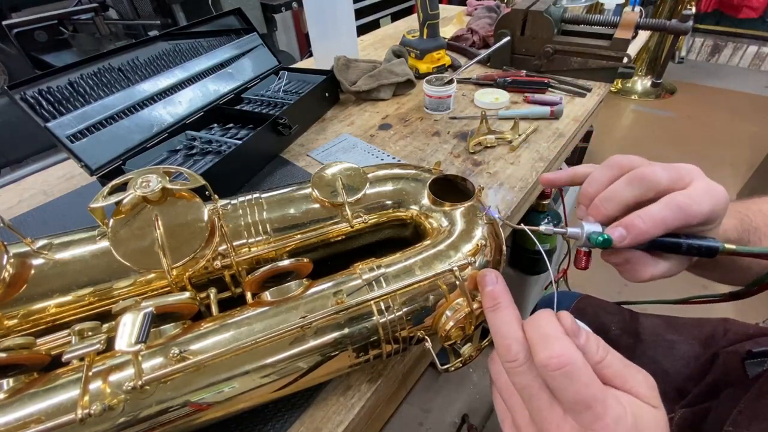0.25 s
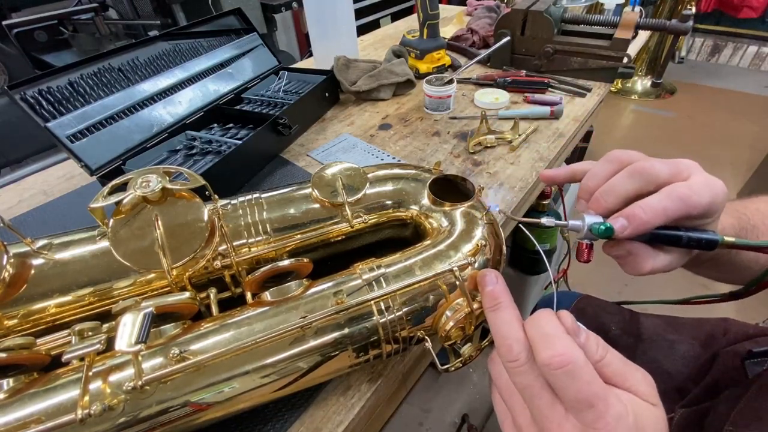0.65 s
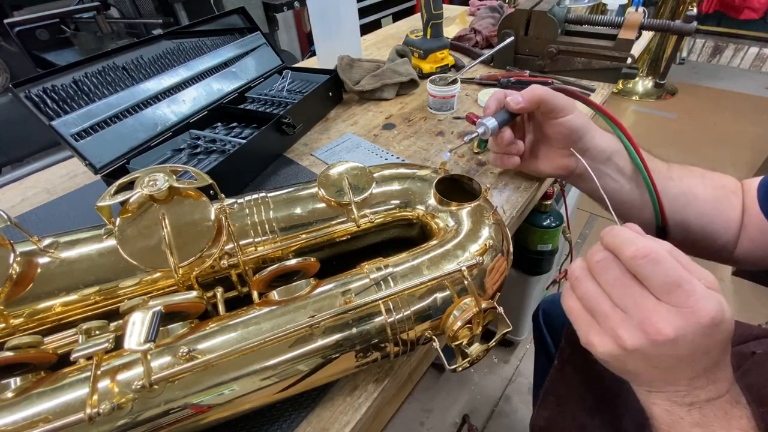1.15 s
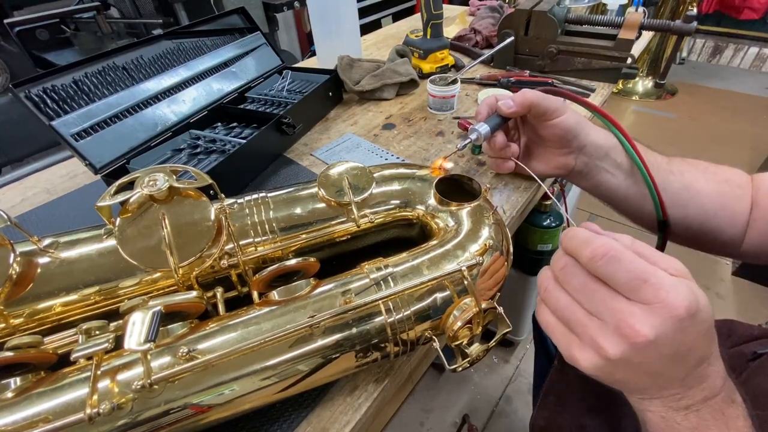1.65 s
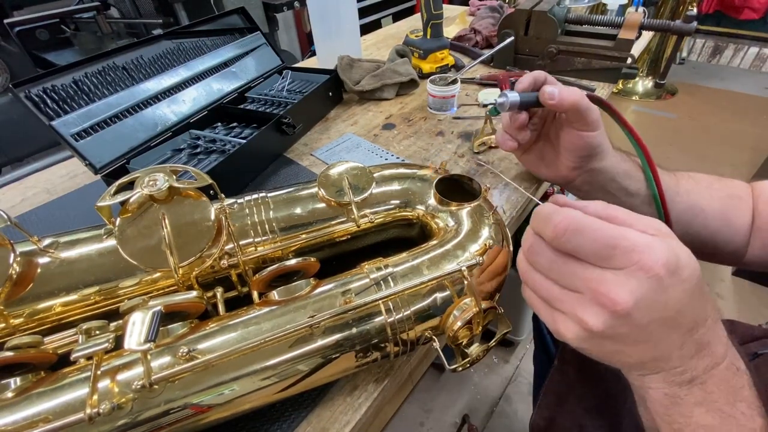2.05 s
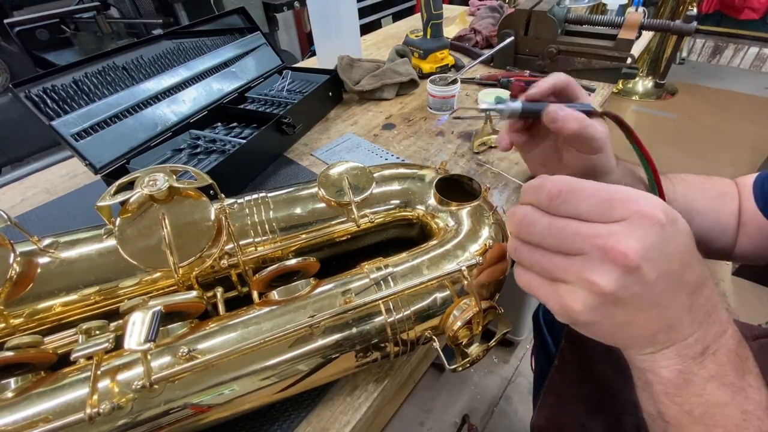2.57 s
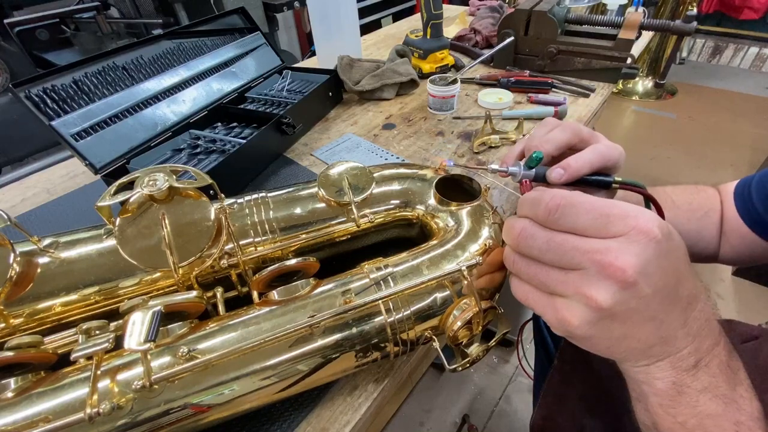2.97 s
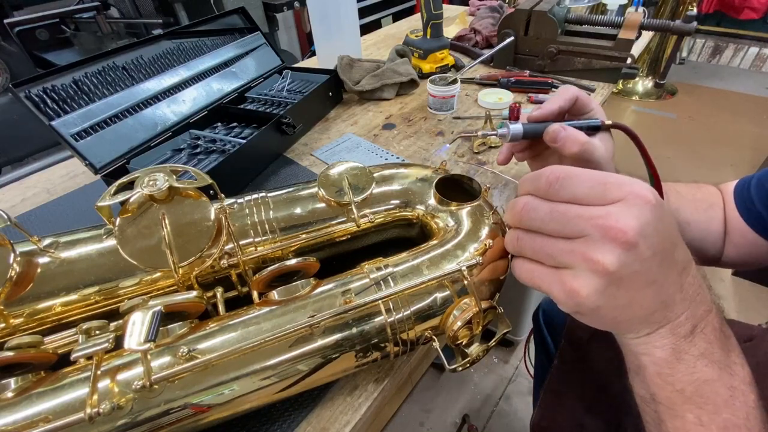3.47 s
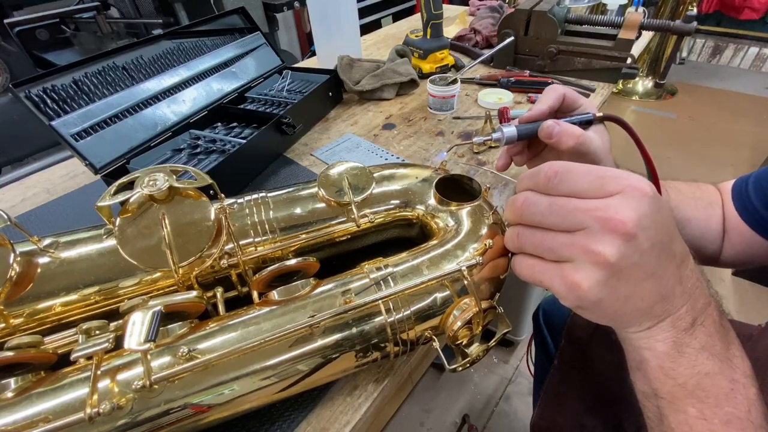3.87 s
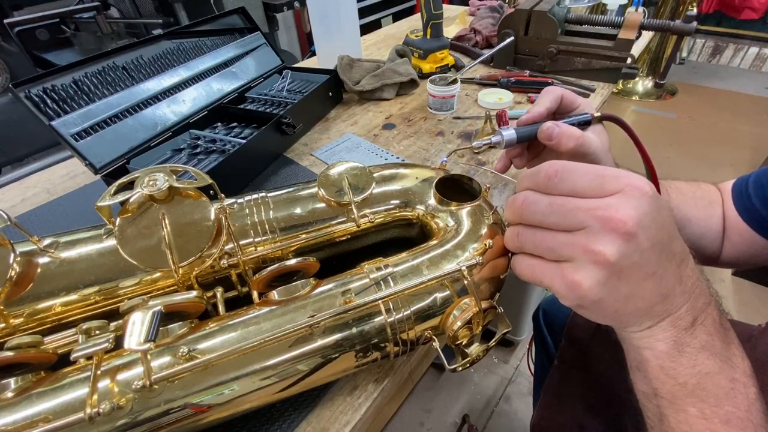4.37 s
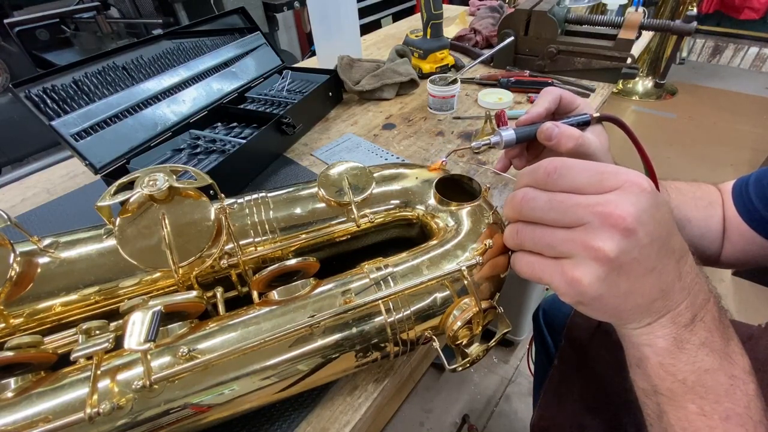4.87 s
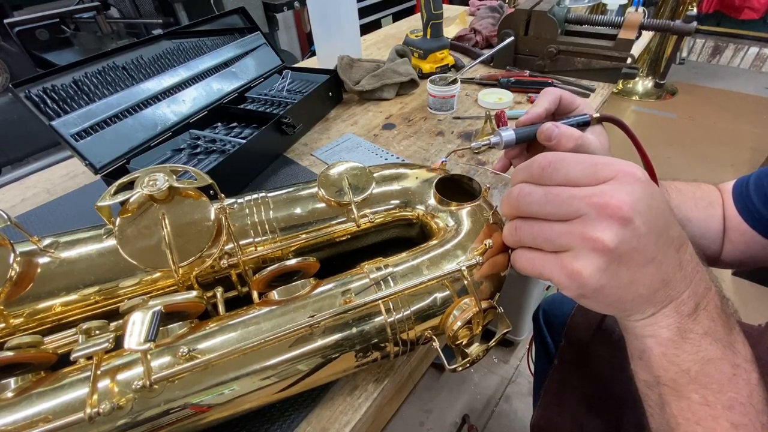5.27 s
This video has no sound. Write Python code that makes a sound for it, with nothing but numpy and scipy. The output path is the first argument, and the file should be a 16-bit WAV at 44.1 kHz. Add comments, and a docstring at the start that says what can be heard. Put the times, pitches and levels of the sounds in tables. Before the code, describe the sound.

Close in an indoor workshop, a twin-piston compressor drones low and buzzing beneath a small torch's steady hiss. Near one second a dry click makes the drone jump and the hiss thins. Flame sizzles, spits and flares over solder until about 1.8 seconds. Near 2.8 a soft hollow valve puff releases gas, the motor quickens slightly, and the hiss gradually fades.

```python
"""On a workshop bench a small gas torch hisses over a brass instrument: coloured turbulent noise and a ring.
Now and then the flame licks the solder: the noise surges as sizzles, spits and flares.
A twin-piston compressor nearby, probably the torch's oxygen concentrator, drones in harmonics of its shaft
rate and slows as pressure builds. When its valve switches, the motor speeds up and vented gas hisses away.
One dry click, a decaying step, sounds as the drone jumps; cabinet air and faint whistles lie behind."""
import sys
import numpy as np
from scipy import signal
from scipy.fft import rfft, irfft
from scipy.io import wavfile

SR = 44100
rng = np.random.default_rng(int(sys.argv[2]) if len(sys.argv) > 2 else 0)


def dump(signal):
    """Clip the signal to [-1, 1] and save it as 16-bit WAV at the path in sys.argv[1]."""
    limited = np.clip(np.atleast_2d(signal).T, -1, 1)
    pcm = np.round(limited * 32767).astype(np.int16)
    wavfile.write(sys.argv[1], SR, pcm)


N = 243873
TIME = np.arange(N) / SR

CLICK_S, VALVE_S = 1.0066, 2.845  # a click, where the hiss stops and the drone jumps; the valve's switch
FREE_SPEED, LOADED_SPEED, RACING_SPEED = 29.02, 28.76, 29.24  # reference shaft speeds, turns per s


def from_db(db):
    """Decibel definition: amplitude ratio of a level difference."""
    return 10 ** (np.asarray(db) / 20)


def rms_one(x):
    """Normalisation to unit root-mean-square amplitude."""
    return x / np.sqrt(np.mean(x ** 2) + 1e-20)


def in_time(rows):
    """Linear interpolation of rows (t/s, value) over the whole scene."""
    return np.interp(TIME, *np.transpose(rows))


def at_hz(rows, hz):
    """Interpolation of each column of a spectrum along a logarithmic frequency axis."""
    points, *columns = np.transpose(rows)
    return [np.interp(np.log(hz), np.log(points), column) for column in columns]


def pan(db):
    """Constant-power panning: left and right gains for a left-right level difference."""
    gains = from_db(np.array([[.5], [-.5]]) * db)
    return gains / np.sqrt(np.mean(gains ** 2, axis=0))


def drift(rate_hz):
    """Low-pass random process: slow motion of rms 1, computed at every hundredth sample."""
    pole = np.exp(-200 * np.pi * rate_hz / SR)
    draws = rng.standard_normal(N // 100 + 1002)
    slow = signal.lfilter([1], [1, -2 * pole, pole * pole], draws)[1000:]  # without the settling time
    return np.interp(np.arange(N) / 100, np.arange(len(slow)), rms_one(slow))


def rush(spectrum, order=4):
    """Turbulence as Gaussian noise shaped by a spectral density, falling steeply beyond the table's ends."""
    hz = np.maximum(np.arange(N // 2 + 1) * SR / N, 1)
    level_db, pan_db, width_db = at_hz(spectrum, hz)
    skirts = np.minimum(1, np.minimum(hz / spectrum[0][0], spectrum[-1][0] / hz)) ** order
    mid, side = rfft(rng.standard_normal((2, N)))
    width = from_db(width_db)
    both = (mid + width * side * [[1], [-1]]) / np.hypot(1, width)
    return irfft(both * pan(pan_db) * from_db(level_db) * skirts, N) * np.sqrt(SR / 2)


def resonance(centre_hz, width_hz):
    """Resonance excited by broadband flow: stereo noise through one band-pass, rms 1."""
    edges = [centre_hz - width_hz / 2, centre_hz + width_hz / 2]
    band = signal.butter(2, edges, "band", fs=SR, output="sos")
    return rms_one(signal.sosfilt(band, rng.standard_normal((2, N))))


def gusts(rows, rise_s, fade_s):
    """Incoherent addition: flows (t/s, length/s, level/dB) rise, hold and die away, summed in power."""
    power = 0
    for start, length, db in rows:
        rise = np.clip((TIME - start) / rise_s, 0, 1)
        fade = np.exp(-np.maximum(TIME - start - length, 0) / fade_s)
        power = power + (from_db(db) * rise * fade) ** 2
    return np.sqrt(power)


PREVIOUS_VALVE_S, JUMP_S = -.9, .01  # the previous cycle still runs out at the start; time to fall silent


def valve_cycle():
    """Cycle timing: seconds since the last switch, and hiss gate (0-1), silent from click to next switch."""
    age = TIME - np.where(TIME < VALVE_S, PREVIOUS_VALVE_S, VALVE_S)
    hissing = np.clip((CLICK_S - TIME) / JUMP_S, 0, 1) + (TIME >= VALVE_S)
    return age, hissing


SLOWEST_SPEED, RELIEF_SPEED = 28.71, .62  # turns per s: the floor, and the scale of the gain on relief
SPIN_UP_AFTER_S, SPIN_UP_S, PRESSURE_BUILD_S = .06, .11, 2.05


def shaft_speed(age, hissing):
    """Torque balance: the relieved motor spins up after a moment, then slows as the pressure builds again."""
    spin_up = np.clip((age - SPIN_UP_AFTER_S) / SPIN_UP_S, 0, 1)
    return SLOWEST_SPEED + RELIEF_SPEED * hissing * spin_up * np.exp(-age / PRESSURE_BUILD_S)


RELIEF_AFTER_S, RELIEF_S = .108, .028  # after the switch: centre and time scale of the pressure's release


def back_pressure(age, speed):
    """Piston loading (0-1): it grows as the motor slows, and lets go smoothly after the valve switches."""
    building = np.clip((FREE_SPEED - speed) / (FREE_SPEED - LOADED_SPEED), 0, 1) ** 3
    return np.maximum(building, .5 - .5 * np.tanh((age - RELIEF_AFTER_S) / RELIEF_S))


# pitch of a second, nearly steady hum, perhaps a fan, near the ninth shaft harmonic: t/s, f/Hz
FAN_HUM_PITCH = [(0, 261.43), (1, 260.05), (2, 259.2), (3, 259.53), (5.53, 260.27)]
FAN_SHARE_FREE, FAN_SHARE_LOADED = 0.27, 0.49  # the hum's amplitude as a share of that harmonic


def fan_beat(tone_angle, load):
    """Beating by phasor addition: level/dB of a tone sliding in and out of step with the fan's hum."""
    fan_angle = 2 * np.pi * np.cumsum(in_time(FAN_HUM_PITCH)) / SR
    share = np.clip(FAN_SHARE_FREE + load * (FAN_SHARE_LOADED - FAN_SHARE_FREE), 0, .9)
    return 20 * np.log10(np.abs(1 + share * np.exp(1j * (tone_angle - fan_angle))))


# the way from the pistons through cabinet and room
DIFFUSE_HZ, ECHO_S, SMEAR_S_PER_HZ, CABINET_HZ, BASS_LEAD_HZ = 330, .014, .000087, 440, 120
LOAD_LAG_S = .0016  # strokes come earlier once back pressure lets go, which bends the upper tones upward
WANDER, FLUTTER = .065, .025  # slow and quick unsteadiness of the upper tones, as shares of amplitude


def tone(shaft, load, order, left_lead):
    """Dispersion: bass keeps step with the pistons; higher tones come later, smeared by cabinet and room."""
    hz = order * FREE_SPEED
    diffuse = min(hz / DIFFUSE_HZ, 1) ** 2
    free, loaded = np.exp(1j * diffuse * rng.normal(0, [.4, .5]))
    scatter = np.angle(free + load * (loaded - free))
    # the two strokes come unevenly spaced, the more so under load: the odd bass tones lag
    limp = order % 2 * (1 - diffuse) * (1.4 + .9 * load)
    # the cabinet delays each pitch differently, which draws the stroke out into a soft throb
    smear = SMEAR_S_PER_HZ * (1 if hz < CABINET_HZ else .3)
    delay_turns = (ECHO_S + LOAD_LAG_S * load) * hz + smear * (hz - CABINET_HZ) ** 2 / 2
    echo = 2 * np.pi * diffuse * delay_turns
    # the deepest tones lead a little; standing waves reach the two sides at different moments
    side_lead = left_lead * np.array([[1], [0]])
    phase = order * shaft + scatter - limp - echo + BASS_LEAD_HZ / hz + side_lead
    wander = WANDER * (drift(2.1) + 1j * drift(1.1))
    flutter = FLUTTER * (drift(6) + 1j * drift(8.9))
    unsteady = 1 + diffuse * (wander + flutter)
    return np.sqrt(2) * (unsteady * np.exp(1j * phase)).real


# harmonics of the shaft rate, before beat, waver and falter: multiple, racing level/dB, free level/dB,
# loaded level/dB, left-right level/dB, phase lead of left over right/rad
SHAFT_HARMONICS = [(2, -31.7, -31.1, -30.8, -3, -0.2), (3, -48.5, -50.3, -53.7, -3, -0.1),
                   (4, -29.5, -28.5, -28.0, -1, -0.2), (5, -40, -38.7, -37.2, -1, -0.3),
                   (6, -44.3, -41.7, -42.0, -1, 0.0), (7, -49.5, -47.3, -42.7, 2, 0.8),
                   (9, -33.8, -32.4, -35.3, -14, -0.4), (10, -58, -60.1, -55.6, 1, 1.3),
                   (11, -48, -45.2, -46.6, 9, -2.5), (12, -48, -54, -57, 8, -0.0),
                   (13, -35.5, -33.6, -35, -9, -0.3), (14, -52.5, -55.1, -53.5, -3, 0.1),
                   (15, -39.5, -39, -37.3, -4, -0.5), (16, -42.5, -43.3, -47.3, -7, -0.5),
                   (17, -41, -44.3, -39.6, -2, -1.3), (18, -46.5, -48.3, -45.8, -2, 1.2),
                   (19, -67, -56, -50.5, -5, -2.2), (20, -59, -55.1, -55.5, 2, 0.0),
                   (21, -56, -62, -64.2, -8, 2.8), (22, -53, -52.0, -58.5, -1, 0.8),
                   (23, -57.5, -61.7, -57.8, -3, -1.5), (24, -64, -63.1, -59.0, -10, -2.9),
                   (25, -62.5, -67.9, -61.8, -4, -1.1), (30, -62, -62.1, -69.2, -5, 0.6),
                   (32, -66, -61.3, -64.3, -6, 2.8), (33, -61, -59.3, -62, 3, -0.5),
                   (35, -65, -63.2, -68.5, 4, 2.2), (36, -68, -62.3, -64.1, 6, 2.0),
                   (39, -74, -68.1, -66.1, -2, 1.8), (40, -63.5, -64.4, -60.4, 1, 0.8),
                   (47, -75, -68.9, -70.1, 5, 2.4)]
# added level of the thirteenth harmonic, which wavers: t/s, level/dB
THIRTEENTH_WAVER = [(0, 0), (.65, 2.8), (1.0, 1.5), (1.1, 0), (2.85, 0), (3.05, -1), (4.8, 0.2),
                    (5.35, -3.5), (5.53, 0)]
# while the motor spins up, the tones around one pitch briefly falter
FALTER_DB, FALTER_AFTER_S, FALTER_WIDTH_S, FALTER_HZ, FALTER_WIDTH_HZ = -11, 0.14, 0.042, 370, 45
GAP_S = .0005  # a very brief gap in the drone at the click


def compressor(shaft, racing, load, beat_db):
    """Harmonic series: two strokes a turn favour low even tones; back pressure shifts the balance."""
    out = np.zeros((2, N))
    beats = {9: beat_db, 13: in_time(THIRTEENTH_WAVER)}
    falter_db = FALTER_DB * np.exp(-((TIME - VALVE_S - FALTER_AFTER_S) / FALTER_WIDTH_S) ** 2)
    for multiple, racing_db, free_db, loaded_db, pan_db, left_lead in SHAFT_HARMONICS:
        order = round(multiple)
        level_db = free_db + racing * (racing_db - free_db) + load * (loaded_db - free_db)
        nearness = np.exp(-((order * FREE_SPEED - FALTER_HZ) / FALTER_WIDTH_HZ) ** 2)
        level_db = level_db + beats.get(order, 0) + falter_db * nearness
        out += from_db(level_db) * pan(pan_db) * tone(shaft, load, order, left_lead)
    return out * (1 - np.exp(-((TIME - CLICK_S) / GAP_S) ** 2))


# the torch's turbulent jet: f/Hz, density level/dB per Hz, left-right level/dB, side-mid level/dB
JET_SPECTRUM = [(2024, -88, 3, 0), (2370, -88.5, 2, -3.5), (3440, -91.5, 1.5, 2), (4100, -96, 3.5, -2),
                (5630, -98, 6.5, 0), (6500, -99, 3.5, -2.5), (7060, -102, 2.5, 1.5), (8150, -100, -0.5, 2),
                (9050, -104, -2, -0.5), (10630, -113, -3.5, -5), (11800, -116, 2, 22.5),
                (13600, -120, -1, -4), (14800, -111, 1, -4), (15500, -103, 0, 18)]
# gain of the jet's treble as the hand turns the torch: t/s, level/dB
JET_TREBLE_GAIN = [(0, 2.5), (.6, 1), (.99, -1), (1.03, -1.5), (1.28, -2), (1.85, 0.5), (2.7, 1.5),
                   (4.3, 1), (5.53, -1)]
TREBLE_FROM_HZ = 7000


def torch(edge_hz=3680, edge_width_hz=480, edge_db=-62.0):
    """Jet noise: an even hiss, brighter or duller as it turns, rings where it grazes the brass until the click."""
    jet = rush(JET_SPECTRUM, order=8)
    hz = np.arange(N // 2 + 1) * SR / N
    treble = irfft(rfft(jet) * (1 - 1 / (1 + (hz / TREBLE_FROM_HZ) ** 8)), N)
    graze = from_db(edge_db) * pan(2.8) * resonance(edge_hz, edge_width_hz) * (TIME < CLICK_S)
    return jet + treble * (from_db(in_time(JET_TREBLE_GAIN)) - 1) + graze


# sizzling flux, before the gain of licks and spits: f/Hz, density level/dB per Hz,
# left-right level/dB, side-mid level/dB
SIZZLE_SPECTRUM = [(1800, -96, 7, -8), (3000, -92, -6.5, -1), (4650, -97, 3, 0.5), (6500, -94, 1, -7),
                   (7300, -99, 1, 4), (8700, -94, -7.5, -5), (11000, -99, 1, 0), (12300, -100, -2.5, 21),
                   (13800, -102, 2, -11), (15500, -100, -2, 8.5)]
# the flame licks the solder: t/s, length/s, sizzle gain level/dB before sputter and crackle, flare level/dB
FLAME_LICKS = [(.86, .045, -7, -74), (1.303, 0.087, -2, -61), (1.378, 0.14, -0.5, -64),
               (1.548, .06, -0.5, -59), (1.619, 0.062, 0.5, -54)]
# hot flux spits, gain at onset: t/s, level/dB
FLUX_SPITS = [(.908, 0), (1.441, -3), (1.487, -4)]
LICK_RISE_S, LICK_FADE_S = 0.034, 0.075


def solder(sputter_db=1.5, crackle_db=1.9, spit_s=0.0036, flare_hz=2600, flare_width_hz=1500,
           ring_hz=6150, ring_width_hz=700, ring_db=-63):
    """Amplitude-modulated noise: at each lick flux sizzles and crackles; the deflected flame flares lower."""
    start, length, sizzle_db, flare_db = np.transpose(FLAME_LICKS)
    surges = from_db(sputter_db * drift(25) + crackle_db * drift(300))
    heat = gusts(zip(start, length, sizzle_db), LICK_RISE_S, LICK_FADE_S) * surges
    spits = sum(from_db(db) * (TIME >= at) * np.exp(-np.abs(TIME - at) / spit_s) for at, db in FLUX_SPITS)
    sizzle = rush(SIZZLE_SPECTRUM) + from_db(ring_db) * resonance(ring_hz, ring_width_hz)
    flare_gain = gusts(zip(start, length, flare_db), LICK_RISE_S, LICK_FADE_S)
    return sizzle * (heat + spits) + flare_gain * resonance(flare_hz, flare_width_hz)


VALVE_HZ, VALVE_DB = 736, -39.5


def valve(width_hz=240, rise_s=.012, fall_s=.016, pan_db=-6,
          rasp_hz=1700, rasp_width_hz=1600, rasp_db=-10, rasp_late_s=.012):
    """Transient excitation of resonances: one soft, hollow puff, followed at once by a light rasp."""
    age = np.maximum(TIME - VALVE_S - np.array([[0], [rasp_late_s]]), 0)
    swell = (1 - np.exp(-age / rise_s)) * np.exp(-age / fall_s)
    puff, rasp = swell / swell.max()
    rasp_sound = from_db(rasp_db) * rasp * resonance(rasp_hz, rasp_width_hz)
    sound = puff * resonance(VALVE_HZ, width_hz) + rasp_sound
    return from_db(VALVE_DB) * pan(pan_db) * sound


# vented gas, before the flow's gain: f/Hz, density level/dB per Hz, left-right level/dB, side-mid level/dB
VENT_SPECTRUM = [(2510, -99, -3, -7), (3800, -94.5, -2, -3.5), (4700, -89, 7, -2), (5040, -95, 3, -6),
                 (5820, -91, 5.5, 0.5), (6400, -95.5, 7, -1), (6900, -98.5, 12, -6.5), (8900, -92.5, -4, 2),
                 (10860, -100, 0.5, -9.5), (11900, -105, 0, 26), (13200, -109, -6, -8),
                 (15400, -92.5, 2.5, 8)]
# a quick rise with a short first burst, then a steady fall
VENT_DB, VENT_RISE_S, VENT_FALL_DB_PER_S = -1, 0.082, 8.5
VENT_BURST_DB, VENT_BURST_S = 3, .06


def vent(age, hissing, flutter_db=0.5, ring_hz=6350, ring_width_hz=620, ring_db=-57.5, ring_rise_s=0.13):
    """Decaying outflow: the hiss is sharp, then thins as pressure falls; the outlet's ring blooms later."""
    since_peak = np.maximum(age - VENT_RISE_S, 0)
    flow = hissing * from_db(VENT_DB - VENT_FALL_DB_PER_S * since_peak + flutter_db * drift(16))
    burst = from_db(VENT_BURST_DB * np.exp(-since_peak / VENT_BURST_S))
    hiss = rush(VENT_SPECTRUM) * np.minimum(age / VENT_RISE_S, 1) ** 1.4 * burst
    ring = from_db(ring_db) * pan(6) * resonance(ring_hz, ring_width_hz)
    return flow * (hiss + ring * np.minimum(age / ring_rise_s, 1) ** 2)


def click(rise_s=.00003, fall_s=0.0007, scale_db=-17.5):
    """Decaying step: a single dry click as the drone jumps."""
    age = np.maximum(TIME - CLICK_S, 0)
    return from_db(scale_db) * (1 - np.exp(-age / rise_s)) * np.exp(-age / fall_s)


# air in the cabinet, before throb, gust and trim: f/Hz, density level/dB per Hz,
# left-right level/dB, side-mid level/dB
CABINET_AIR_SPECTRUM = [(25.7, -83, 2, -8), (60.4, -68, -11.5, -10.5), (129, -70.5, 4, -12.5),
                        (188, -72.5, -8, -8), (254, -60, -14.5, 6.5), (290, -66, 1, 4.5),
                        (433, -64.5, -10, -8), (555, -77, -2.5, -0.5), (756, -80, 2, 3),
                        (940, -77.5, -0.5, 2), (1410, -85, 6.5, 0), (1486, -77.5, 1.5, 9),
                        (1926, -92.5, 1, -5.5)]


def cooling_air(shaft, load, throb_db=1.0, gust_db=0.8, level_db=-0.3, loaded_db=-0.1, throb_lag_s=0.003):
    """Flow modulation: air rushing through the cabinet throbs once a turn, just after the stronger stroke."""
    throb = np.cos(shaft - 2 * np.pi * FREE_SPEED * throb_lag_s)
    gain_db = level_db + loaded_db * load + throb_db * throb + gust_db * drift(4.9)
    return rush(CABINET_AIR_SPECTRUM, order=8) * from_db(gain_db)


# brief hollow swells, strongest as the gas escapes: t/s, length/s, f/Hz, bandwidth/Hz, level/dB
DRONE_SWELLS = [(.65, 0.21, 390, 160, -40.5), (.88, 0.12, 408, 150, -38.5), (2.925, 0.051, 450, 30, -33),
                (2.95, .058, 614, 35, -49), (3.0, .04, 357, 60, -42), (3.14, .09, 355, 35, -43),
                (4.57, 0.17, 400, 170, -42.5), (4.856, 0.082, 420, 140, -38.5)]


def hollow_swells(rise_s=0.02, fade_s=0.027, pan_db=-5):
    """Narrow-band noise: short, hollow swells colour the drone."""
    out = np.zeros((2, N))
    for start, length, hz, width_hz, db in DRONE_SWELLS:
        out += gusts([(start, length, db)], rise_s, fade_s) * resonance(hz, width_hz)
    return pan(pan_db) * out


# when the faint whistle sounds: t/s, length/s, level/dB
WHISTLE_SPANS = [(0, 1.8, -60.5), (2.35, 0.075, -49), (2.85, 0.2, -54.5)]
WHISTLE_RISE_S, WHISTLE_FADE_S = 0.054, 0.055


def whistle(centre_hz=1158, width_hz=30):
    """Sharp resonance of airy noise: a faint whistle comes and goes."""
    return gusts(WHISTLE_SPANS, WHISTLE_RISE_S, WHISTLE_FADE_S) * resonance(centre_hz, width_hz)


START_TURN, SKIP_TURN = .835, .37  # shaft angle at the start, and the drone's skip ahead at the click, turns


def scene():
    """Superposition: the valve cycle sets shaft speed, which drives the drone and tells the pistons' load."""
    age, hissing = valve_cycle()
    speed = shaft_speed(age, hissing)
    turned = 2 * np.pi * np.cumsum(speed) / SR
    shaft = turned + 2 * np.pi * (START_TURN + SKIP_TURN * (TIME >= CLICK_S))
    load = back_pressure(age, speed)
    racing = np.clip((speed - FREE_SPEED) / (RACING_SPEED - FREE_SPEED), 0, 1) ** 2
    drone = compressor(shaft, racing, load, fan_beat(9 * turned, load))
    flame = torch() + solder()
    release = valve() + vent(age, hissing)
    background = cooling_air(shaft, load) + hollow_swells() + whistle()
    return drone + flame + release + click() + background


CUTOFF_HZ = 15900


def record(dry):
    """Band limiting: an elliptic low-pass cuts the top steeply; the ends fade within a few milliseconds."""
    fade = np.clip(np.minimum(TIME, TIME[-1] - TIME) / .006, 0, 1)
    low_pass = signal.ellip(12, .1, 80, CUTOFF_HZ, fs=SR, output="sos")
    return fade * signal.sosfilt(low_pass, dry)


dry = scene()
out = record(dry)
dump(out)
```